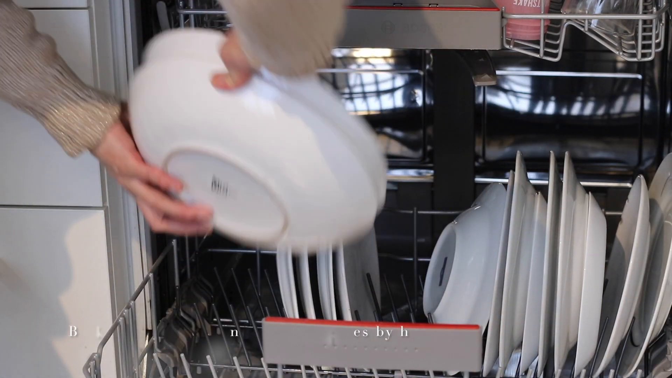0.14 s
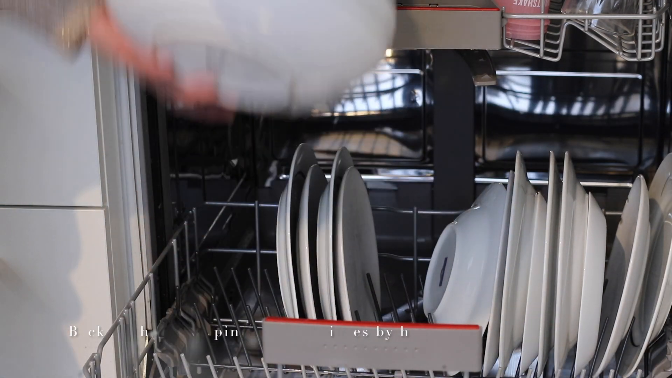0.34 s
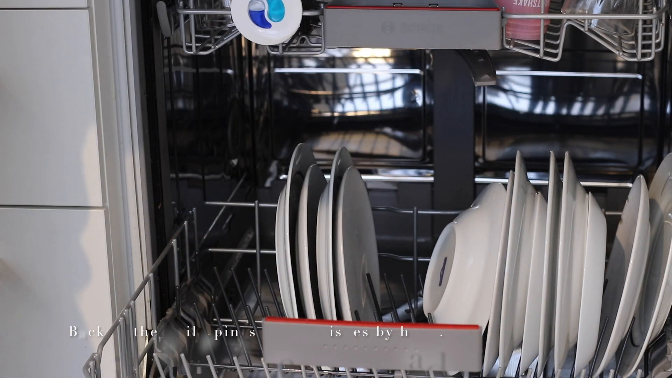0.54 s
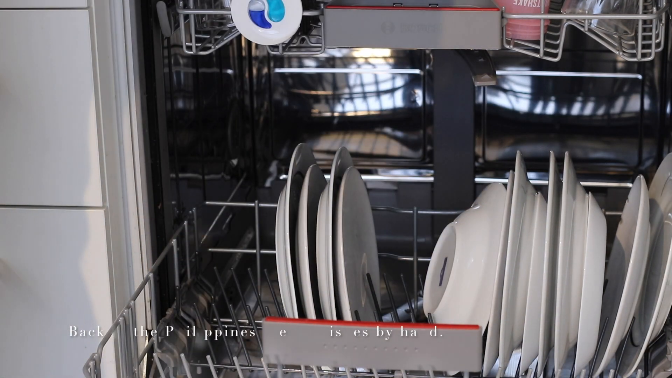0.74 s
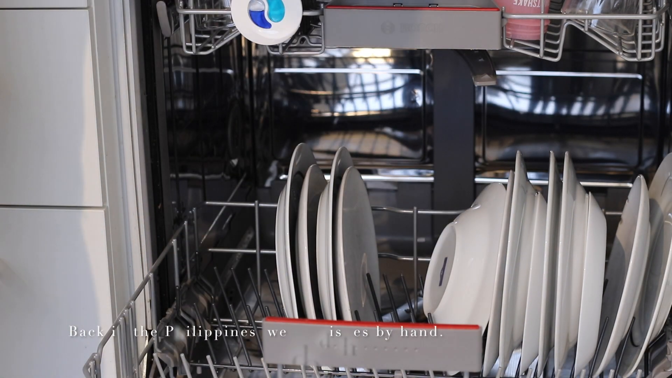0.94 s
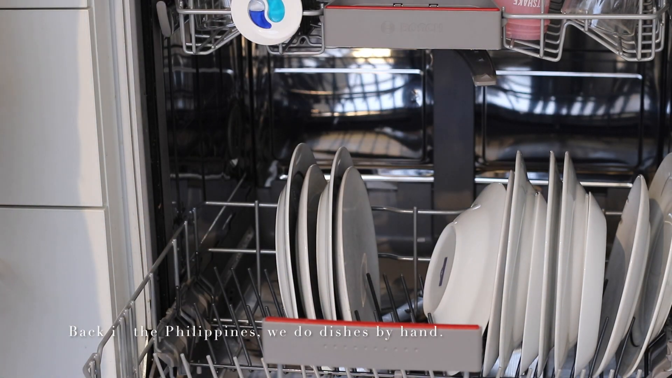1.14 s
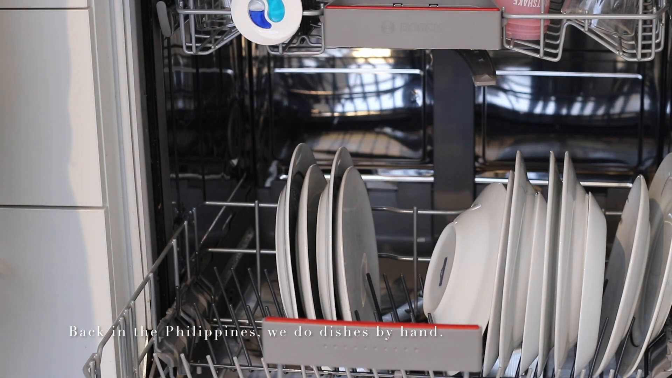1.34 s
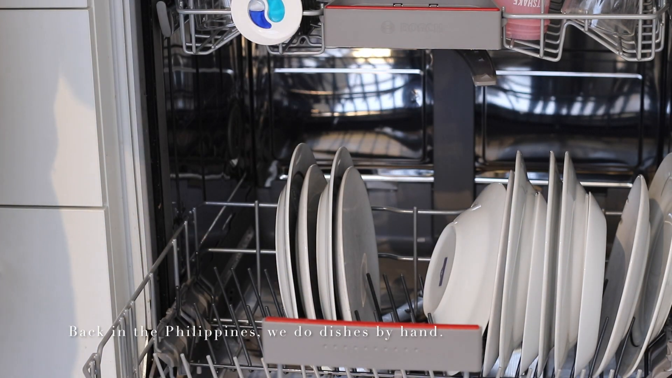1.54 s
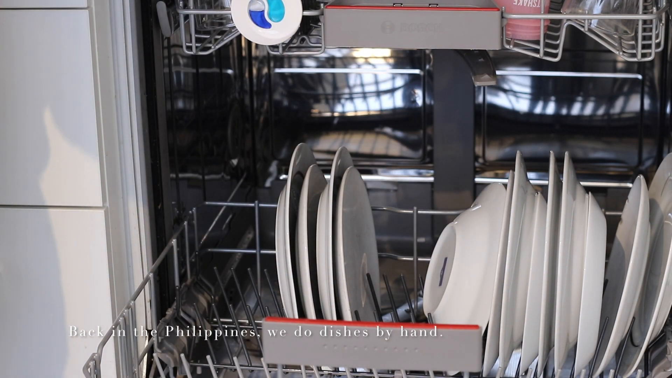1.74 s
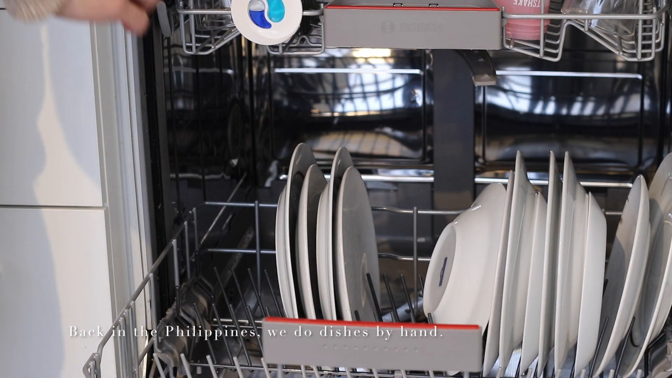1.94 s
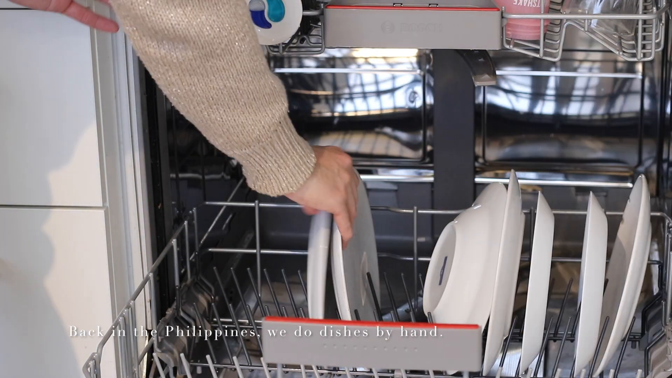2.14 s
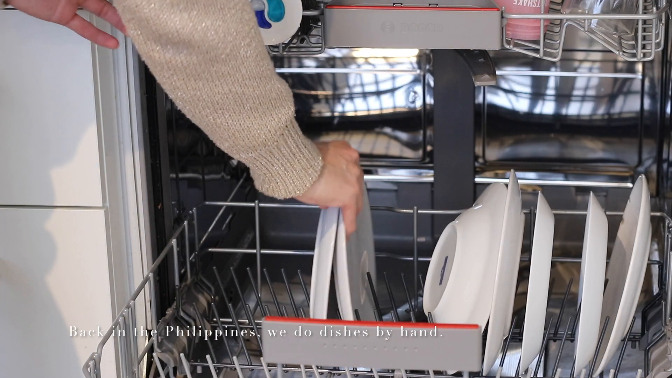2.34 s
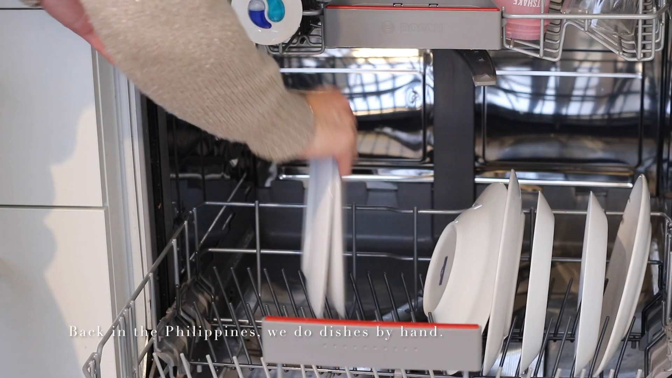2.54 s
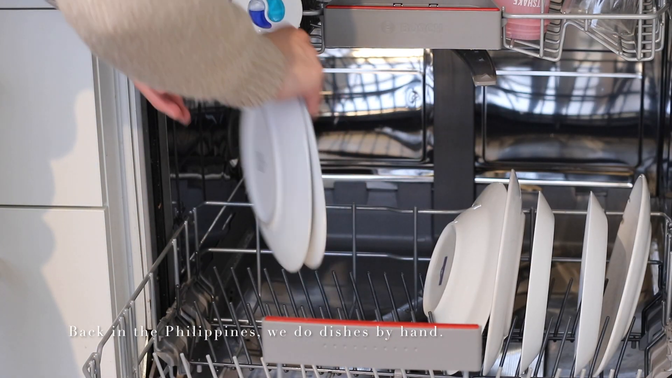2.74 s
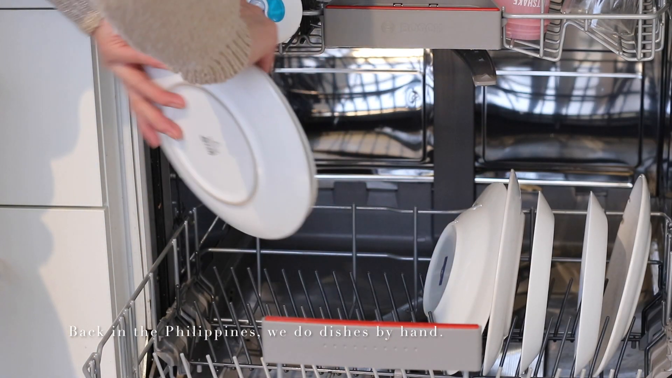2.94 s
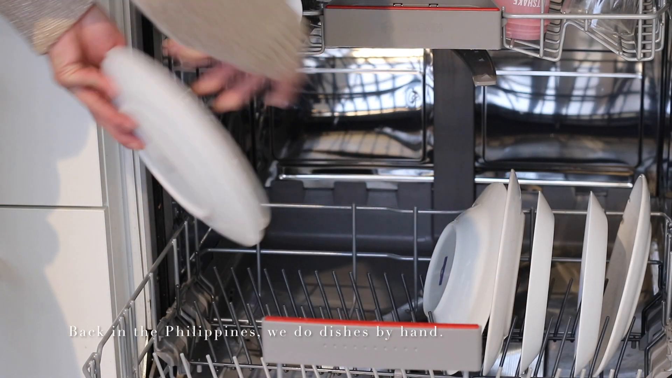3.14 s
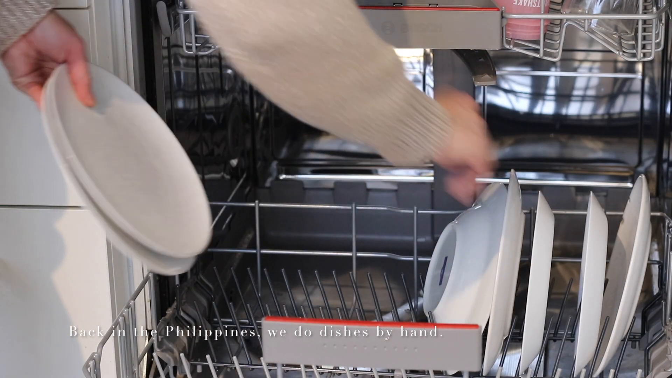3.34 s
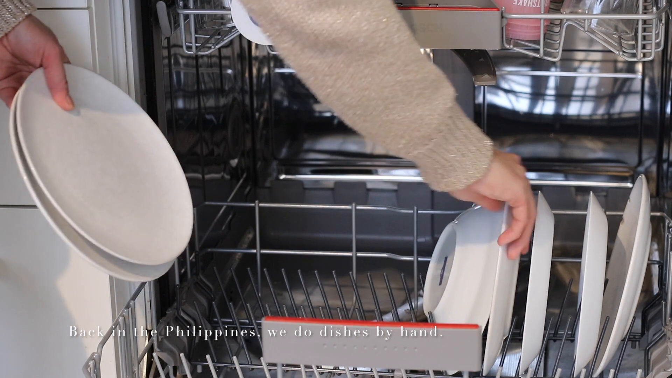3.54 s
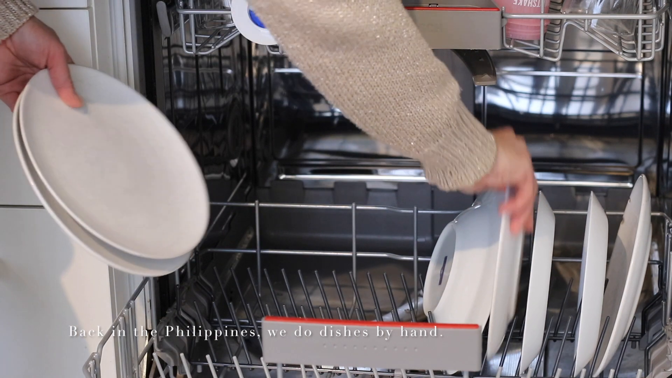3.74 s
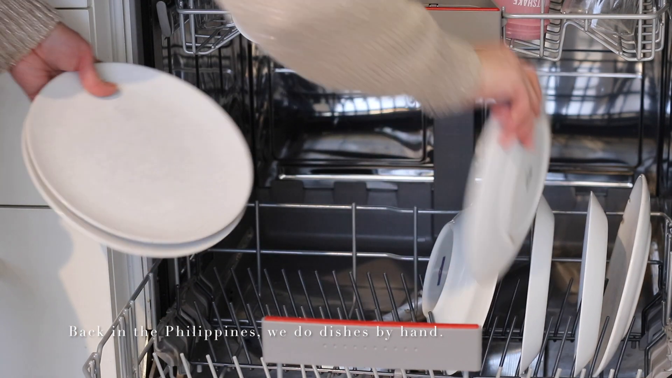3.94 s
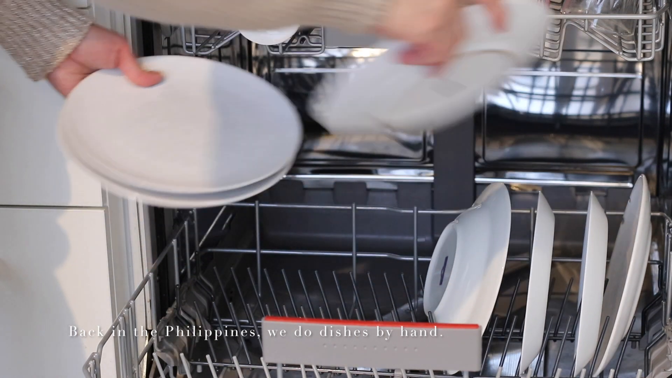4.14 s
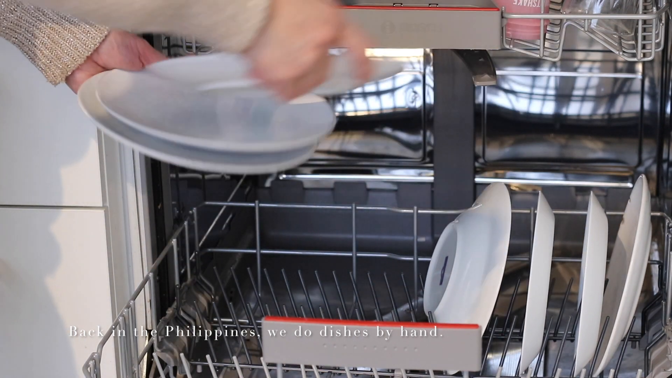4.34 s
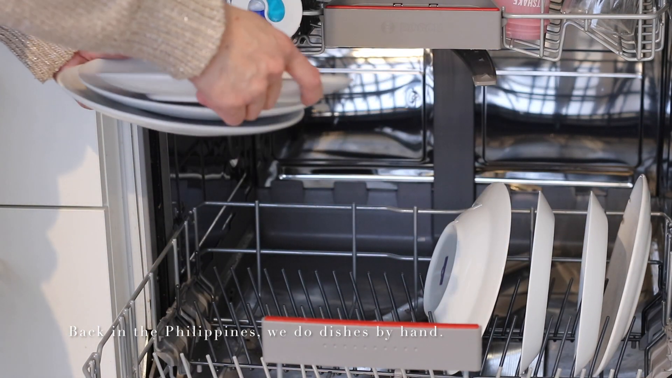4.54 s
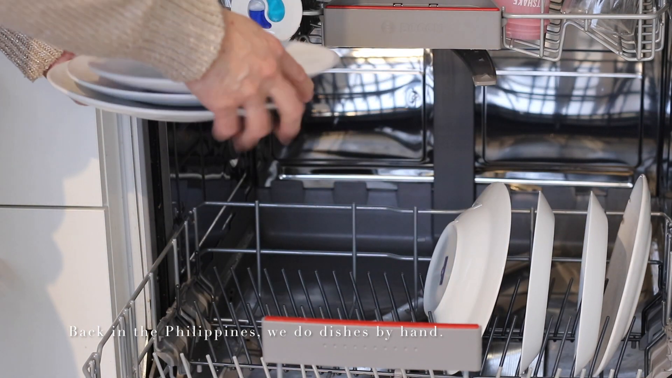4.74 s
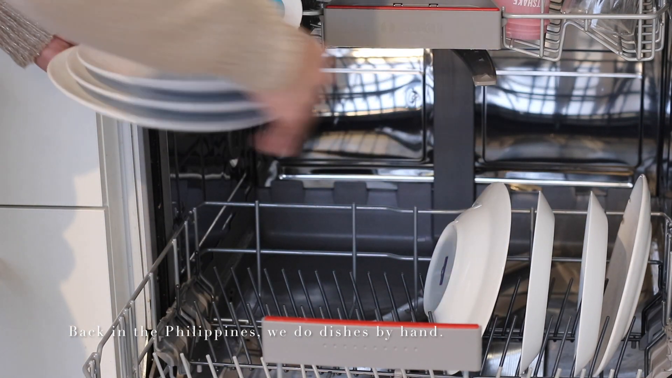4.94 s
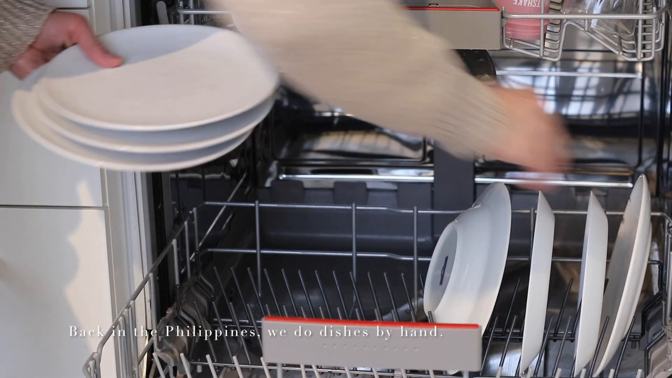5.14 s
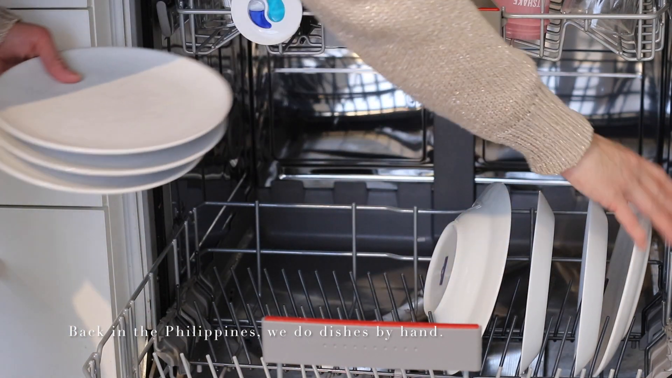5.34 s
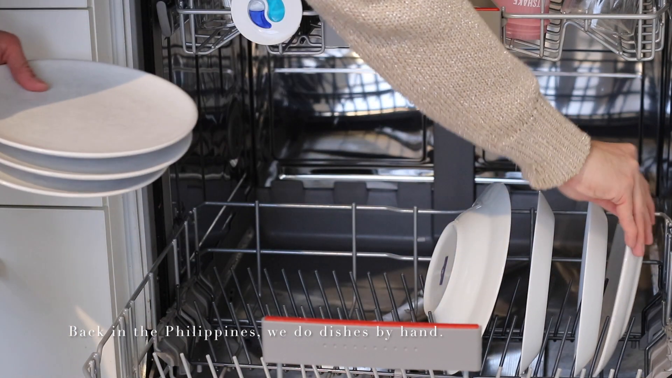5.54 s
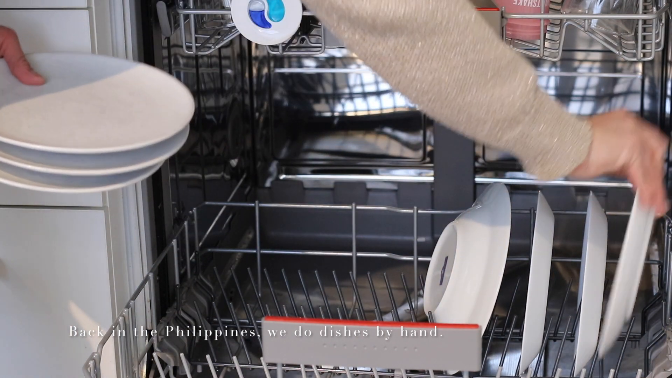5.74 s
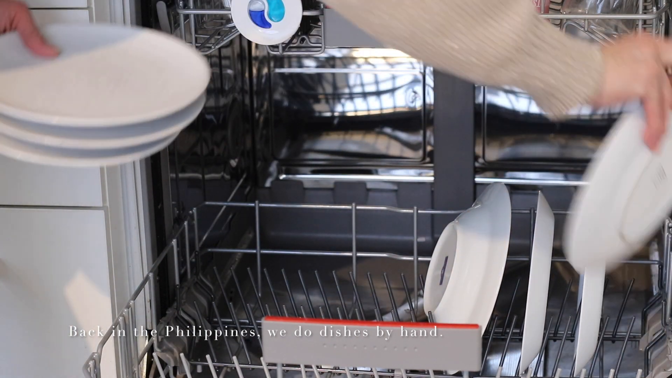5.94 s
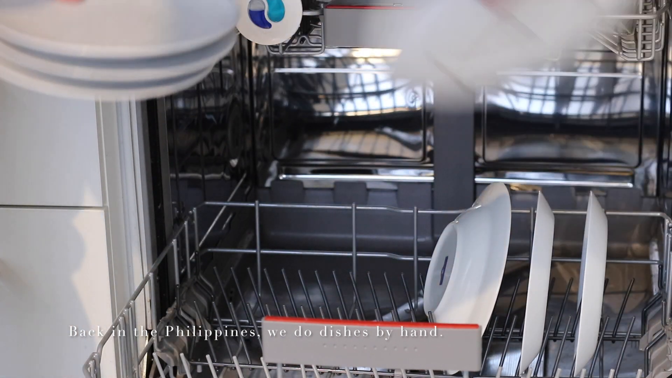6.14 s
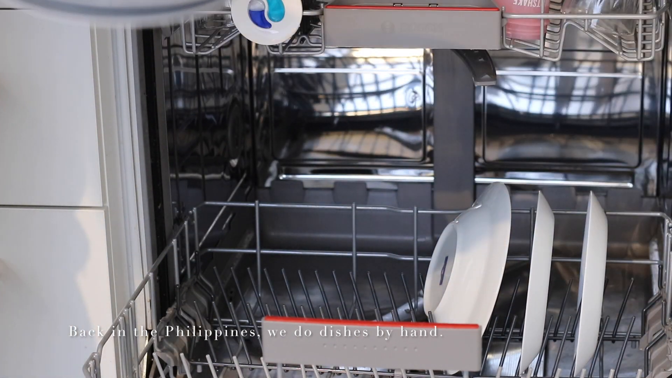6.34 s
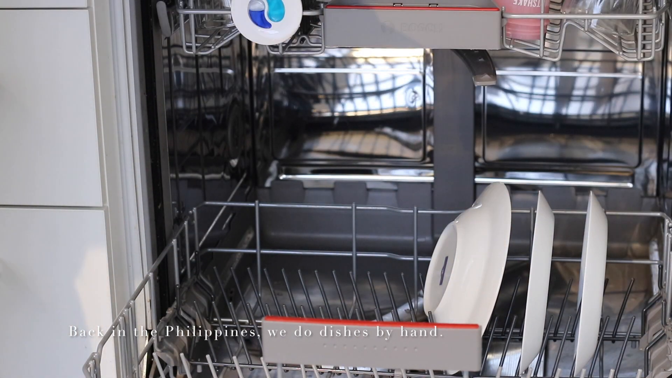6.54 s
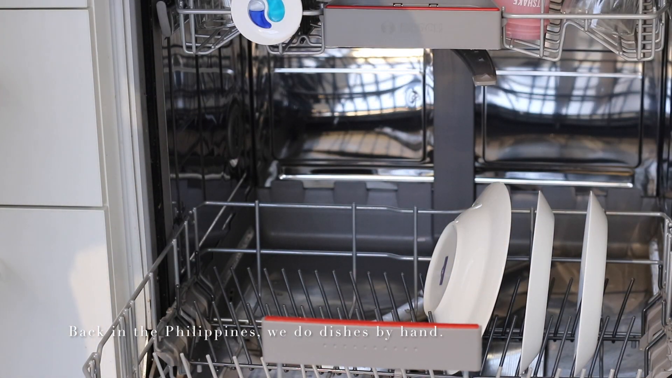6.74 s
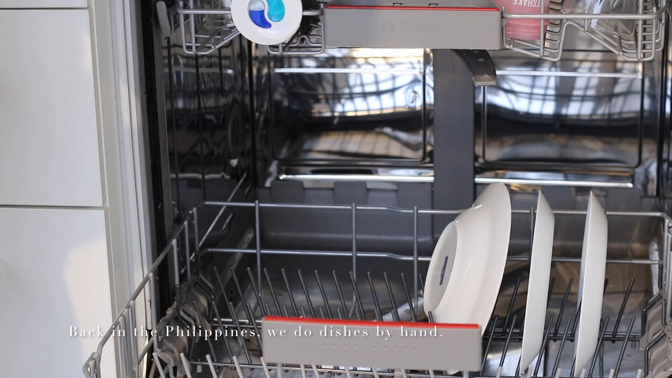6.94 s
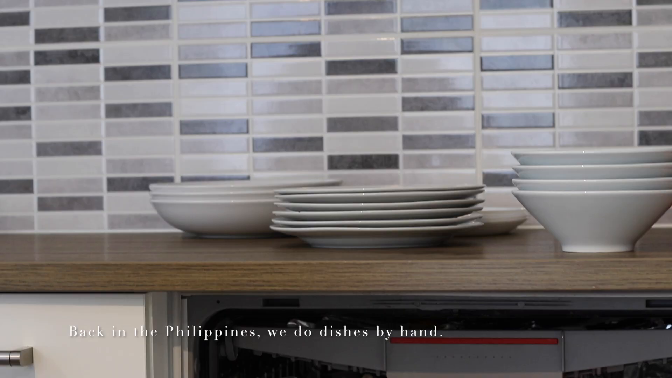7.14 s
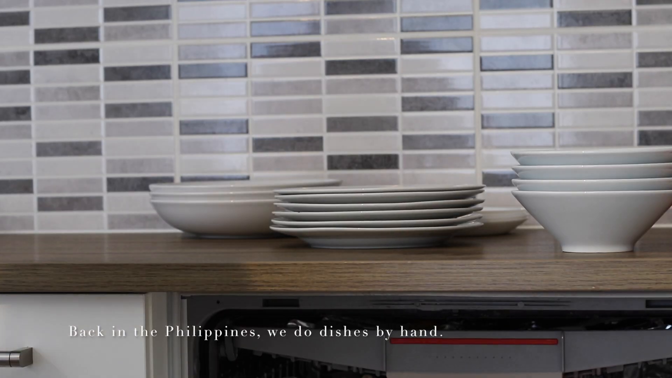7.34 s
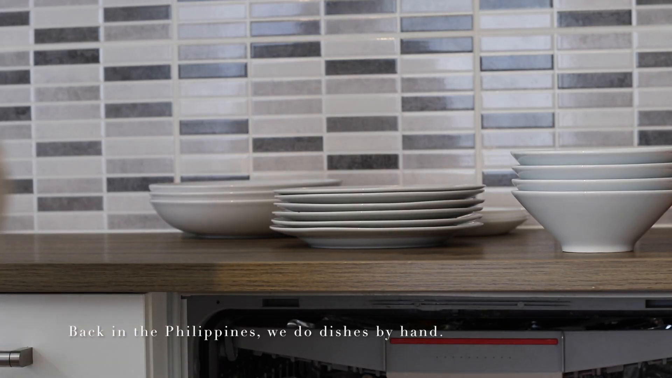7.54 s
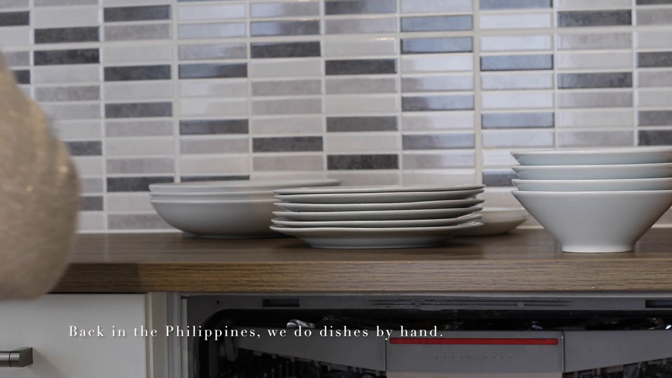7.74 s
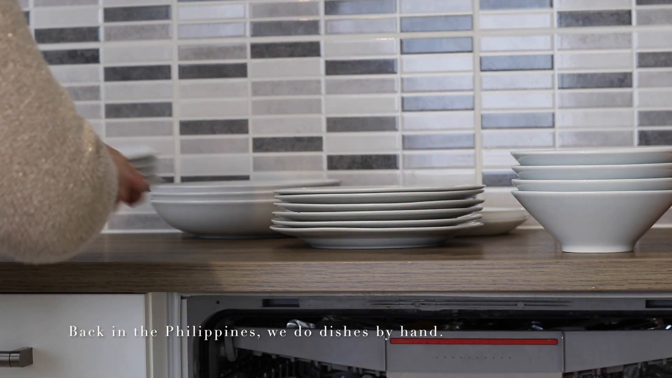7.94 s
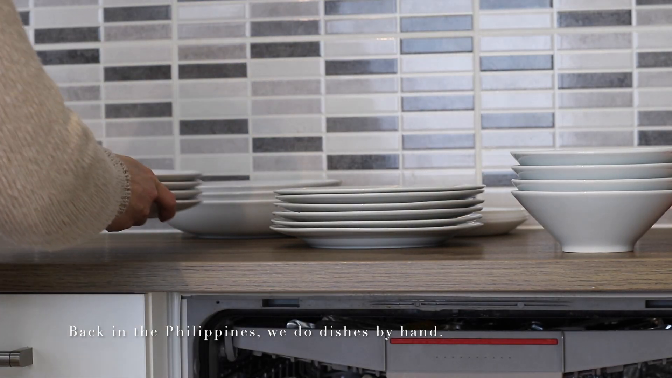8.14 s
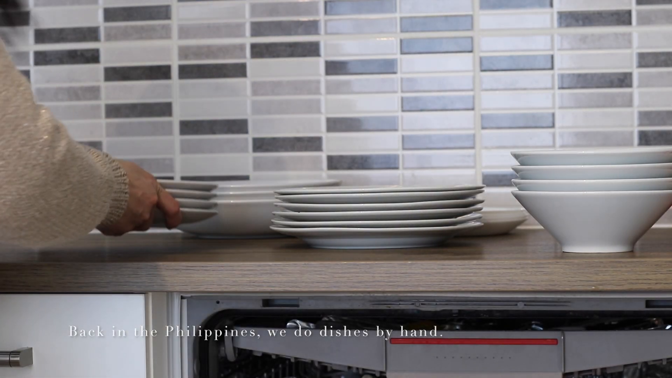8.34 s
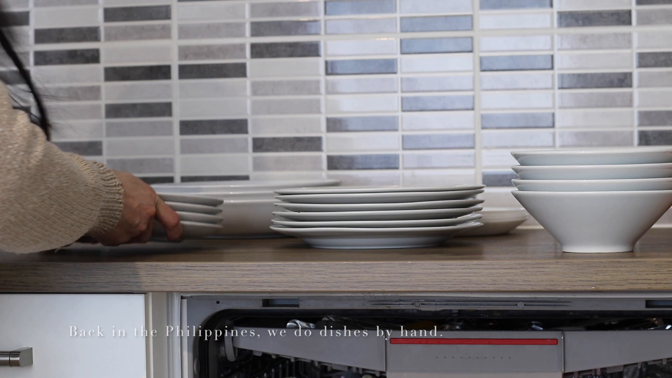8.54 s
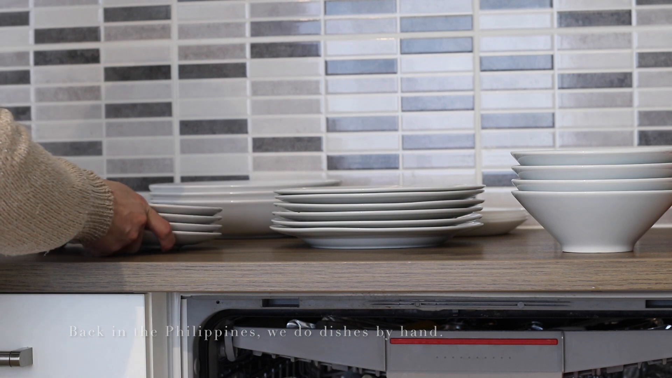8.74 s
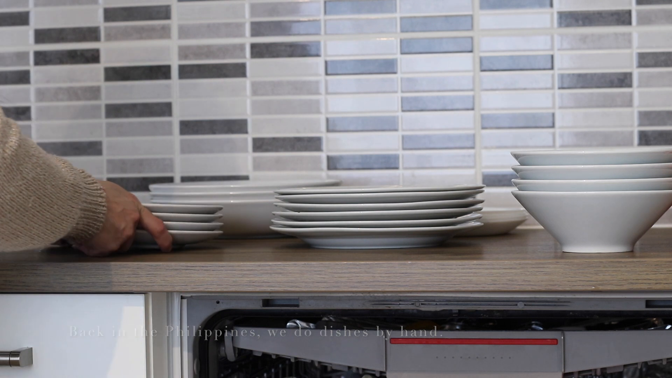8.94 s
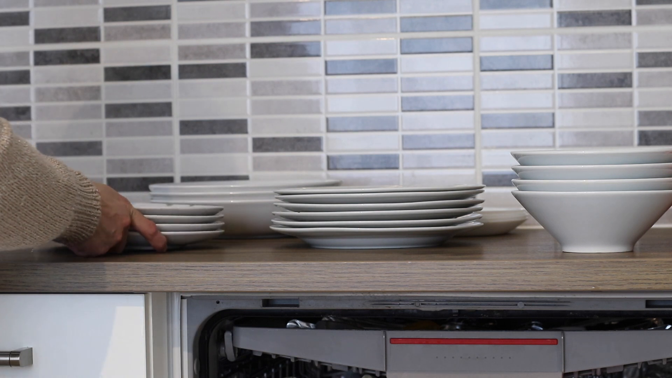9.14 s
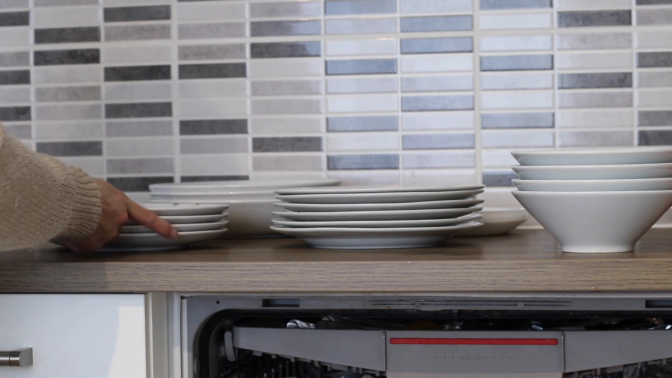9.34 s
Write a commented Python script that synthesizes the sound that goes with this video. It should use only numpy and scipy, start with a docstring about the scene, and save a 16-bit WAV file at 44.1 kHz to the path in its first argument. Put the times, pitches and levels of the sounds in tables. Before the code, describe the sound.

Dishes are gathered from a metal rack and stacked, heard near and mostly a little to the left. Bowls clatter first, a pause follows, then a rack knock and sharp plate clinks. Glazed rims grate and ring in several bursts, densest in the middle. Low soft steps and a woolly rustle lead to a solid set-down on wood with small final scrapes. The small room answers briefly over quiet air noise.

```python
"""Stacking dishes on a wooden counter

Ceramic bowls and plates are lifted out of a dish rack, gathered in one hand and stacked on the counter.
Rims clink and slide over each other: short touches and tiny catches set each load's own tones ringing.
Shaped noise makes the rack's knock and jingle, the low rumble, a sleeve's rustle and the kitchen air.
Soft steps are low ringing thuds, and a faint hum is a sum of sines. Gain control turns loud moments down."""
import sys
import numpy as np
from scipy import signal
from scipy.fft import rfft, irfft
from scipy.io import wavfile
from scipy.ndimage import uniform_filter1d

SR = 44100
rng = np.random.default_rng(int(sys.argv[2]) if len(sys.argv) > 2 else 0)


def master_out(mix):
    """Clip the mix to full scale and print it as 16-bit PCM to the path in sys.argv[1]."""
    frames = np.transpose(np.atleast_2d(mix))
    ceiling = np.clip(frames, -1, 1)
    pcm = np.round(ceiling * 32767).astype(np.int16)
    wavfile.write(sys.argv[1], SR, pcm)


N = 413658   # length [samples]


def from_db(db):
    """Turn decibels into a plain multiplier."""
    return 10 ** (np.asarray(db) / 20)


def rms_one(x):
    """Scale a sound so its average strength (rms) is 1."""
    return x / np.sqrt(np.mean(x ** 2) + 1e-20)


def in_time(spans):
    """Draw a level curve as a multiplier for every sample, silent between the spans."""
    t = np.arange(N) / SR
    s, level_db = np.transpose(np.concatenate(spans))
    inside = sum((t >= span[0][0]) & (t <= span[-1][0]) for span in spans) > 0
    return inside * from_db(np.interp(t, s, level_db))


def at_hz(points, hz):
    """Read a curve of frequency points, with straight lines between them on a log-frequency axis."""
    point_hz, value = np.transpose(points)
    return np.interp(np.log(hz + 1), np.log(point_hz), value)


def coloured(x, spectrum):
    """Colour a sound with a filter that never sounds early (minimum phase) and has energy 1."""
    level_db = at_hz(spectrum, np.fft.rfftfreq(4096, 1 / SR))
    cepstrum = irfft(np.log(from_db(level_db)))
    # folding the second half onto the first moves the filter's response after its start
    cepstrum[1:2048] *= 2
    cepstrum[2049:] = 0
    taps = irfft(np.exp(rfft(cepstrum)))
    return signal.fftconvolve(x, taps / np.linalg.norm(taps))[:len(x)]


def ring(force, hz, width):
    """A push sets one tone ringing: a unit click starts a sine of height 1, and a wider tone dies sooner."""
    r = np.exp(-np.pi * max(width, 2) / SR)
    w = 2 * np.pi * hz / SR
    return signal.lfilter([0, np.sin(w)], [1, -2 * r * np.cos(w), r * r], force + 1e-18)


def burst(s, peak_db, t60):
    """Noise that starts at once and dies away by 60 dB in t60 seconds."""
    t = np.arange(N) / SR - s
    return (t >= 0) * from_db(peak_db - 60 * np.clip(t, 0, 2) / t60) * rng.standard_normal(N)


# How alike the left and right ear are: (frequency [Hz], likeness [0 to 1])
LIKENESS = [(60, 0.28), (240, 0.96), (950, 0.12), (3770, 0.02), (15000, 0.021)]


def two_ears(mid, side, hz):
    """Mix two independent noises into left and right that are as alike as the table says."""
    alike = np.clip(at_hz(LIKENESS, hz), 0, 1)
    return np.sqrt(1 + alike) * mid + np.sqrt(1 - alike) * side * [[1], [-1]]


# Colour of the air noise: (frequency [Hz], relative level [dB per Hz])
AIR = [(12, -44.5), (20, -11), (43, -9.5), (264, 1.5), (295, 4.5), (449, 1.5), (502, -1.5), (744, 0.5),
       (855, -7.5), (957, -4.5), (3190, -16), (4110, -16.5), (4600, -19.5), (9800, -16), (16200, -32)]
AIR_DB = -55   # rms level of the air noise
# Mains hum: (frequency [Hz], rms level [dB])
HUM = [(50, -69.5), (100, -70.5), (150, -71), (210, -74.5)]


def room_tone():
    """Coloured air noise, most alike in both ears near 240 Hz, and a faint mains hum of steady sines."""
    hz = np.fft.rfftfreq(N, 1 / SR)
    mid, side = rfft(rng.standard_normal((2, N))) * from_db(at_hz(AIR, hz))
    air = irfft(two_ears(mid, side, hz), N)
    hum = np.zeros(N)
    for hum_hz, level_db in HUM:
        turns = hum_hz * np.arange(N) / SR + rng.random()
        hum += np.sqrt(2) * from_db(level_db) * np.sin(2 * np.pi * turns)
    return from_db(AIR_DB) * rms_one(air) + hum


# How long the echoes last: (frequency [Hz], time to fall 60 dB [s])
WALLS = [(200, 0.22), (1000, 0.42), (4000, 0.37), (12000, 0.2)]


def kitchen(x):
    """Add the room's echoes: noise that dies away band by band, with energy 1 in each ear."""
    t, tail = np.arange(SR // 2) / SR, 0
    for low in 100 * 2. ** np.arange(7):
        high = 2 * low + (low > 6000) * 5000   # the top band reaches further up
        band = signal.butter(2, [low, high], "band", fs=SR, output="sos")
        mid, side = signal.sosfilt(band, rng.standard_normal((2, len(t))))
        both = two_ears(mid, side, 0.5 * low)
        tail = tail + both * from_db(-60 * t / at_hz(WALLS, 1.36 * low))
    tail = tail * np.clip(t / 0.0026, 0, 1)   # the first echoes take a few ms to arrive
    return signal.fftconvolve(x, tail / np.linalg.norm(tail, axis=1, keepdims=True), axes=1)[:, :N]


# Glaze sliding on glaze, one list per slide: (time [s], pressure level [dB])
SLIDE = [
    [(0.0, -25), (0.086, -36.5), (0.274, -47.5), (1.134, -54.5), (1.248, -76)],
    [(2.188, -62.5), (2.768, -23), (2.954, -41), (3.118, -87)],
    [(3.58, -55.5), (3.972, -32), (4.33, -43.5), (4.5, -73)],
    [(4.507, -26.5), (4.701, -27), (5.407, -39), (5.695, -55), (6.0, -81)],
    [(6.654, -28), (6.702, -27), (6.972, -24.5), (7.556, -61.5), (7.906, -46.5), (8.1, -93)],
    [(9.037, -72), (9.38, -45)],
]


def slide_grains():
    """Rough glaze catches about 1200 times a second, in uneven sizes; pressure sets the level."""
    catches = rng.random(N) < 1200 / SR
    size_db = 4.5 * np.minimum(rng.exponential(1, N), 3.5)
    grains = catches * from_db(size_db) * rng.choice([-1, 1], N)
    return rms_one(grains) * in_time(SLIDE)


EDGE_DB_TO_HALVE, PEAK_DB_TO_HALVE = 55, 33.5   # brighter and harder clinks are quicker contacts


def contacts():
    """A clink is one sharp touch, then a chatter of the rims that grows with contact time; energy 1."""
    s, peak_db, edge_db, _ = np.transpose(CLINKS)
    load = np.searchsorted([start for start, _ in LOADS], s) - 1
    halvings = edge_db / EDGE_DB_TO_HALVE + peak_db / PEAK_DB_TO_HALVE
    ms = np.clip(np.array(PLACES)[load, -1] * 2 ** -halvings, .05, 12)[:, None]
    t = np.arange(1, 2001) / SR * 1000 / ms   # time counted in contact times
    chatter = t * np.exp(-t) * rng.standard_normal(t.shape)
    chatter = chatter / np.linalg.norm(chatter, axis=1, keepdims=True)
    chatter[:, :1] = (1.87 / ms) ** 2   # quick contacts are almost all touch
    return chatter / np.linalg.norm(chatter, axis=1, keepdims=True)


# Rim on rim: (time [s], relative level [dB], relative level of the high tones [dB], favoured frequency [Hz])
CLINKS = [(0.0024, -9, 7.5, 1890), (0.0493, -20, -38, 1900), (0.1473, -18.5, -50, 1940),
          (0.183, -38, -30, 1940), (0.4745, -31.5, 2.5, 2340), (0.5596, -2.5, -0.5, 1700),
          (0.5711, 5, -5, 1220), (0.8614, -41.5, 4, 1140), (0.9644, -18, -7, 723),
          (0.9761, -21, 11.5, 1280), (1.0348, -17.5, 6.5, 732), (1.044, -7.5, -7, 732),
          (1.1063, -4.5, -6, 743), (1.1225, -13, -2.5, 929), (2.1874, -27, 8.5, 4390),
          (2.2284, -14.5, 12, 4060), (2.2433, -6, -0.5, 2910), (2.473, -29.5, 11.5, 2310),
          (2.5159, -34, 23, 3820), (2.5626, -14, 3, 1420), (2.609, -42.5, 30, 3180), (2.643, -1, 0, 1070),
          (2.6843, -17, 13.5, 1050), (3.1002, -44, -0.5, 2090), (3.128, -23, -3, 1790),
          (3.5849, -20.5, -67, 3100), (3.6719, -27.5, -22, 3000), (3.7898, -23.5, -28, 3110),
          (3.8718, -30, 7, 3120), (3.914, -26, 22.5, 5560), (3.9706, -14, 0, 2830),
          (4.031, -12.5, -14, 1820), (4.0923, -17.5, -1.5, 2970), (4.1026, -11, -11.5, 2930),
          (4.1503, -17.5, -32, 1930), (4.2239, -4.5, -4, 690), (4.2722, -12.5, -10.5, 1910),
          (4.5058, -7.5, 10.5, 2940), (4.5102, -6, -33, 2990), (4.7083, -0.5, -6, 1010),
          (4.7638, -12.5, -46, 1027), (4.808, -2, -34, 1000), (4.817, -3, -1.5, 1030),
          (4.9536, -8, -1.5, 1050), (5.0829, -48, -17, 1070), (5.1572, -50, 2, 4040),
          (5.209, -16, 16.5, 4010), (5.2227, -16, -26, 4110), (5.275, -22, 10.5, 3140),
          (5.2879, -9.5, -9, 969), (5.7325, -14, -11, 1040), (5.7638, -16.5, -29.5, 1840),
          (5.8513, -38, 13.5, 2970), (6.184, -40.5, -16, 2660), (6.652, -6.5, 8.5, 1250),
          (6.7742, -10, -37, 1910), (6.8481, -5, 8, 2960), (6.9248, -4.5, -34, 1220),
          (7.002, -9, -6.5, 1170), (7.09, -14, 2.5, 1000), (7.099, -5, -15.5, 1060),
          (7.218, -9.5, -7.5, 1950), (7.383, -25, -52, 834), (7.4314, -11, -5, 1240),
          (7.6027, -30, -10, 921), (7.7042, -37, -1, 2560), (7.8616, -16.5, -1, 1610),
          (7.8708, -7, -5.5, 3040), (8.7152, -7, -6, 3150), (8.9356, -33.5, -40, 842),
          (8.9988, -27.5, -6.5, 926), (9.0904, -23, -11.5, 1200), (9.1701, -27, -9, 856),
          (9.2361, -23.5, -9.5, 1130)]
# Colour of the dry contact noise: (frequency [Hz], relative level [dB per Hz])
GRIT = [(180, -99), (300, -30.5), (774, -23), (1040, -12.5), (1510, -22), (1900, -7.5), (2400, -20.5),
        (2930, -17), (8790, -29.5), (16000, -52.5)]
# The tones each load of dishes rings with: (centre frequency [Hz], undamped width [Hz], relative level [dB])
BOWL_PAIR = [(684, 100, 2), (1150, 36, 0), (1390, 37, -3), (1900, 45, 1), (3010, 60, 2), (3290, 90, -1),
             (2610, 300, -14), (4300, 150, -8), (3640, 65, -9), (5340, 76, -4), (7090, 120, -2),
             (10820, 120, -8), (12600, 36, -14)]
BOWLS_SET_DOWN = [(718, 160, 10), (978, 59, 5), (1279, 284, 15), (2020, 40, -38), (2380, 47, -20),
                  (3350, 280, 6), (3670, 300, 7.5), (4000, 69, -14), (4760, 75, -12), (6050, 86, 2),
                  (8410, 420, 12.5), (9400, 21, 4), (10500, 20, 4.5)]
PLATES_IN_RACK = [(687, 52, -1.5), (2261, 65, 8), (3164, 200, 21.5), (1060, 14, 11), (1145, 50, 6),
                  (1390, 45, 8), (1780, 60, 7), (1935, 70, 8), (3220, 180, -16), (4055, 260, 12.5),
                  (4490, 240, 15.5), (6500, 170, 7.5), (7630, 73, 12), (8430, 48, 2), (8840, 84, -15),
                  (10700, 27, -23), (11100, 46, 5), (12100, 19, -7.5)]
PLATE_PAIR = [(685, 4.3, -6.5), (975, 15, 6), (1180, 15, 8.5), (1270, 21, -11), (1840, 62, 7),
              (1984, 17, 4), (2220, 12, 2.5), (2950, 230, 18), (3720, 290, 10.5), (4850, 180, 9.5),
              (6600, 170, 16), (8250, 140, -1), (8500, 54, -27), (10570, 130, -36.5)]
LOOSE_PLATE = [(689, 6.4, -16), (1080, 200, 5), (1370, 40, -17), (1490, 48, 1), (2035, 170, -19),
               (3058, 130, 9.5), (3660, 180, 4), (3990, 140, 4.5), (4474, 180, 9), (5400, 170, 10.5),
               (6610, 430, 13), (7700, 160, 4), (8510, 53, 7.5), (10230, 37, -7.5), (11200, 39, 0.5),
               (12700, 170, -3.5)]
STACK_OF_THREE = [(374, 24, -22.5), (1046, 25.5, 13), (1112, 19, -2), (1151, 73, 12), (1797, 23, -27),
                  (1796, 4.3, -2.5), (2054, 21, -4), (3110, 30, -1.5), (2935, 120, 4), (3474, 50, -4.5),
                  (4215, 69, 1), (5200, 64, -10), (6450, 91, -30), (6580, 58, -2), (8260, 160, 4),
                  (12080, 47, -11)]
STACK_SQUARED = [(360, 66, -10), (628, 32, -9), (1144, 38, 2.5), (1980, 78, -3.5), (2274, 130, -5.5),
                 (2450, 40, -17), (3073, 126, 5), (3500, 83, -23), (4210, 270, 1.5), (5420, 84, -4),
                 (6500, 100, -15), (6870, 350, 3), (8740, 31, 0), (11600, 33, -24)]
LAST_PLATE = [(1257, 140, -7.5), (1820, 15.3, -17), (2937, 11, -8.5), (3230, 43, -24.5), (3730, 59, 5.5),
              (4740, 240, 10), (4660, 27, -3), (6050, 69, 0), (7640, 24, 6), (9500, 110, 5),
              (11400, 43, -1)]
STACK_OF_FOUR = [(1120, 30, 0), (1210, 40, 4), (1326, 40, -3), (1910, 8, 8), (2960, 16, 6), (662, 50, -10),
                 (2520, 40, -8), (3761, 15, -8), (3170, 34, 0.5), (3580, 40, -13), (4610, 570, 8),
                 (6770, 290, 7.5), (9500, 150, -2), (11300, 25, 7), (13400, 58, -23)]
STACK_CARRIED = [(1136, 254, 25.5), (1524, 56, 15.5), (2070, 99, 8), (2680, 58, -22), (3204, 530, 22.5),
                 (3670, 120, -12), (5900, 1500, 14.5)]
ON_COUNTER = [(373, 220, 11), (800, 173, 13), (1620, 340, 8), (2820, 220, -28), (3015, 220, 0),
              (3600, 70, -8)]
# Which load sounds from when: (start time [s], tones of that load)
LOADS = [(0, BOWL_PAIR), (.54, BOWLS_SET_DOWN), (2.1, PLATES_IN_RACK), (3.07, PLATE_PAIR),
         (3.52, LOOSE_PLATE), (4.49, STACK_OF_THREE), (5.205, STACK_SQUARED), (5.72, LAST_PLATE),
         (6.6, STACK_OF_FOUR), (7.084, STACK_CARRIED), (8.6, ON_COUNTER)]
# Each load in turn: (left-right difference [dB], level sent to the room [dB], level of its low clink tones [dB],
# brightness of its slide [dB per octave], contact time of a clink with both levels at 0 dB [ms])
PLACES = [(-5, -1, -56, -0.1, 2.8), (-6.5, -1, -6.5, -1, 3.5), (-13.5, 3.5, -25, -3.1, 2.2),
          (-43.5, 27.5, -20.5, -9, 1.96), (-5.5, -1, -32.5, -5.5, 2.5), (-4, -5.5, -28.5, -0.8, 4),
          (-5.5, 7.5, -5, 1, 1.5), (-9.5, 2, 19.5, 1.5, 2.5), (-0.5, 0, -28.5, -2.5, 3),
          (-5.5, 0.5, -8.5, 1.2, 2.5), (-3.5, 5.5, -7, 0, 1.5)]
TRAVEL_S, TRAVEL_DB = 0.0564, 8   # the sliding contact travels round the rim: new random drive this often


def dishes(ring_db, slide_db, crack_db, grit_db, spread_db, favour_db, lean_db):
    """Clinks and the grains of a slide drive the tones of the load in hand; both add a dry contact noise."""
    s, peak_db, edge_db, spot_hz = np.transpose(CLINKS)
    at = np.round(s * SR).astype(int)
    chatter, grains = contacts(), slide_grains()
    sides = np.array([[.5], [-.5]])   # left, right
    dull, bright = [signal.butter(2, 3500, kind, fs=SR, output="sos") for kind in ("low", "high")]
    direct, to_room = np.zeros((2, N)), np.zeros((1, N))
    ends = [start for start, _ in LOADS[1:]] + [N / SR]
    for (start, modes), end, (pan_db, room_db, body_db, tilt_db, _) in zip(LOADS, ends, PLACES):
        a, b = round(start * SR), min(round(end * SR) + SR // 4, N)   # a quarter second to ring out
        mine = np.flatnonzero((s >= start) & (s < end))
        rub = (np.arange(a, b) < end * SR) * grains[a:b]

        def blows(gain_db):
            """The force of this load's clinks, each with its own gain."""
            force = np.zeros(b - a + chatter.shape[1])
            for k in mine:
                force[at[k] - a:][:chatter.shape[1]] += from_db(gain_db[k]) * chatter[k]
            return force[:b - a]

        dull_force = blows(crack_db + peak_db) + rub * from_db(grit_db)
        bright_force = blows(crack_db + 5.5 + peak_db + edge_db) + rub * from_db(grit_db + 1.6 * tilt_db)
        dry_noise = signal.sosfilt(dull, dull_force) + signal.sosfilt(bright, bright_force)
        load = coloured(dry_noise, GRIT) * np.ones((2, 1))
        loud = np.linalg.norm(from_db(np.array(modes)[:, 2]))
        stops = np.arange(0, b - a + TRAVEL_S * SR, TRAVEL_S * SR)
        for centre_hz, width, level_db in modes:
            octave = np.log2(centre_hz / 2500)
            colour_db = (body_db if octave < 0 else edge_db) * min(abs(octave) / 1.9, 1)
            # the spot that is struck favours one family of tones
            colour_db = colour_db + favour_db * np.exp(-(np.log2(centre_hz / spot_hz) / 0.093) ** 2)
            loss = 2 + 0.3 * (centre_hz / 1000) ** 3   # fingers and neighbours damp high tones most
            slip = rub * from_db(slide_db + tilt_db * octave) * np.sqrt(4 * np.pi * (width + loss) / SR)
            # as the contact travels, each tone is driven unevenly
            wander = np.interp(np.arange(b - a), stops, rng.standard_normal(100)[:len(stops)])
            slip = slip * from_db(TRAVEL_DB * wander)
            # no two dishes are alike, so each mode is a pair of close tones that beat
            for hz in centre_hz + width * np.array([-.3, .35]):
                scatter_db = rng.normal(0, 1.87, len(s))
                force = blows(ring_db + peak_db + colour_db + scatter_db) + slip
                tone = ring(force, hz, .5 * width + loss) * from_db(level_db) / loud
                # each tone leaves from its own part of the rim: own side, own tiny lag between the ears
                aim_db = sides * (spread_db * rng.normal() + lean_db * octave)
                lagged = np.roll(tone, rng.integers(-3, 4))
                load += np.array([tone, lagged]) * from_db(aim_db)
        direct[:, a:b] += load * from_db(sides * pan_db)
        to_room[:, a:b] += load.mean(0) * from_db(room_db)
    # dishes are too small to radiate bass
    no_bass = signal.butter(4, 450, "high", fs=SR, output="sos")
    return signal.sosfilt(no_bass, direct + kitchen(to_room))


# Blows on the rack: (time [s], level [dB], jingle level relative to the blow [dB])
KNOCK = [(2.032, -3.5, -43), (2.042, -16.5, 2.5)]
# Hollow colour of the rack: (frequency [Hz], relative level [dB per Hz])
RACK = [(35, -40), (60, -21.5), (238, 3), (593, -8), (698, -0.5), (1090, -7.5), (2970, -22), (3190, -25),
        (7940, -43.5), (9130, -41), (16000, -46)]
KNOCK_T60_S, KNOCK_CUT_S = 0.23, 2.108   # time to fall 60 dB [s], time of the cut [s]


def rack_knock():
    """A hollow double blow of dying noise sets the wires jingling; an edit cuts the knock short."""
    hollow = coloured(sum(burst(s, db - 5.5, KNOCK_T60_S) for s, db, _ in KNOCK), RACK)
    wires = signal.butter(2, [5000, 10000], "band", fs=SR, output="sos")
    jingle = signal.sosfilt(wires, sum(burst(s, db + jingle_db, 0.14) for s, db, jingle_db in KNOCK))
    first = np.zeros(N)
    first_s, first_db, _ = KNOCK[0]
    first[round(first_s * SR)] = from_db(first_db - 3.5)
    knock = hollow + jingle + ring(first, hz=1207, width=73)
    cut = np.clip((KNOCK_CUT_S - np.arange(N) / SR) / 0.0083, 0, 1)
    return knock * cut * from_db([[1.0], [-1.0]])   # a little louder on the left


# Rack, then wooden counter, shaken by the dishes: (time [s], level [dB])
SHAKES = [(2.27, -51), (2.56, -43.5), (3.762, -50.5), (4.146, -52.5), (5.818, -45), (9.0, -46.5),
          (9.35, -38.5)]
# Low tones of the rack: (frequency [Hz], width [Hz], relative level [dB])
RUMBLE_MODES = [(169, 100, -3.5), (281.4, 200, -4)]
# Low tones of the counter: (frequency [Hz], width [Hz], relative level [dB])
COUNTER_MODES = [(293, 80, 2.5), (365, 35, -4)]
SHAKE_RISE_DB_PER_S, SHAKE_FALL_DB_PER_S = 55.5, 87
# the stack lands on the counter
SET_DOWN_S, SET_DOWN_DB, SET_DOWN_RISE_S, SET_DOWN_T60_S = 8.708, -18, 0.0056, 0.32


def rumble():
    """Noise in the low tones of rack and counter swells and fades round each shake, and thuds at the landing."""
    t = np.arange(N) / SR
    level = np.zeros(N)
    for s, db in SHAKES:
        swell_db = np.minimum(SHAKE_RISE_DB_PER_S * (t - s), SHAKE_FALL_DB_PER_S * (s - t))
        level += from_db(db + swell_db)
    landing_rise = np.clip((t - SET_DOWN_S) / SET_DOWN_RISE_S, 0, 1)
    level += landing_rise * from_db(SET_DOWN_DB - 60 * np.abs(t - SET_DOWN_S) / SET_DOWN_T60_S)
    no_deep_bass = signal.butter(4, 140, "high", fs=SR, output="sos")
    shake = signal.sosfilt(no_deep_bass, rng.standard_normal(N))
    rack, counter = [rms_one(sum(from_db(db) * ring(shake, hz, width) for hz, width, db in modes))
                     for modes in (RUMBLE_MODES, COUNTER_MODES)]
    return level * np.where(t < SET_DOWN_S, rack, counter)


# Soft steps: (time [s], level [dB], frequency [Hz], time to fall 60 dB [s])
STEPS = [(7.213, -34, 66, 0.35), (7.537, -32.5, 317, 0.1), (7.645, -43, 63.5, 0.39),
         (7.819, -33.5, 67, 0.33), (8.501, -44.5, 313, 0.14)]


def steps():
    """Each soft push sets a low floor or cabinet tone ringing."""
    out = np.zeros(N)
    for s, db, hz, t60 in STEPS:
        push = np.zeros(N)
        push[round(s * SR)] = from_db(db)
        out += ring(push, hz, np.log(1000) / np.pi / t60)
    return signal.sosfilt(signal.butter(2, 450, fs=SR, output="sos"), out)


# Rustle of the sleeve: (time [s], level [dB])
SLEEVE = [(7.9, -75), (8.17, -51.5), (8.354, -57.5), (8.6, -112)]


def sleeve():
    """Wool brushing past: soft bright noise, separate in each ear."""
    band = signal.butter(1, [2500, 11000], "band", fs=SR, output="sos")
    return in_time([SLEEVE]) * rms_one(signal.sosfilt(band, rng.standard_normal((2, N))))


def scene():
    """Everything heard in the kitchen, added together."""
    # crack: dry noise of a clink; favour: lift of the favoured tones;
    # spread: random left-right scatter of single tones; lean: left-right shift per octave
    plates = dishes(ring_db=-6.5, slide_db=-12.5, crack_db=12.0, grit_db=-3.0,
                    spread_db=7, favour_db=11, lean_db=-7.0)
    return room_tone() + plates + rack_knock() + rumble() + steps() + sleeve()


def record(dry):
    """Gain control turns loud moments down and then recovers; peaks are rounded, the top is cut."""
    level_db = 10 * np.log10(uniform_filter1d(np.mean(dry ** 2, axis=0), size=441) + 1e-12)
    # the followed level jumps up at once and falls at 810 dB per second
    fall_db = 810.0 * np.arange(N) / SR
    held_db = np.maximum.accumulate(level_db + fall_db) - fall_db
    over_db = np.maximum(held_db + 23.5, 0)   # how far above -23.5 dB
    lag = np.exp(-1 / (0.023 * SR))   # the gain follows with a 23 ms lag
    smooth_over_db = signal.lfilter([1 - lag], [1, -lag], over_db)
    squeezed = dry * from_db(4.0 - 0.7 * smooth_over_db)
    top_cut = signal.cheby2(12, 60, 16800, fs=SR, output="sos")
    return signal.sosfilt(top_cut, np.tanh(squeezed))


dry = scene()
out = record(dry)
master_out(out)
```